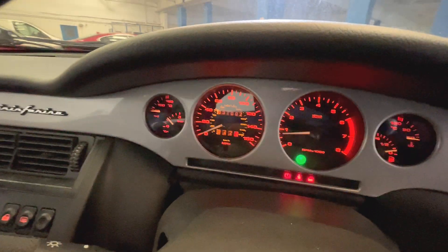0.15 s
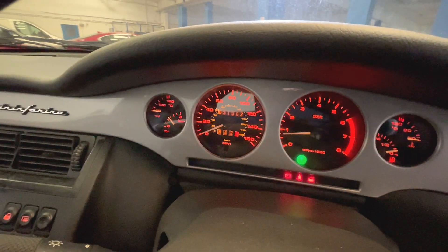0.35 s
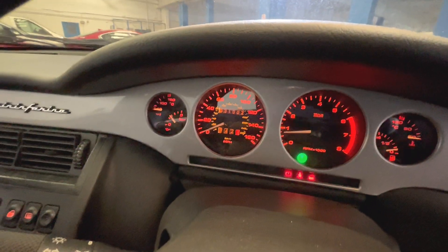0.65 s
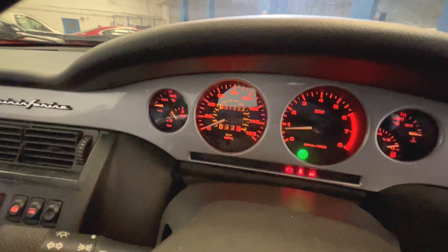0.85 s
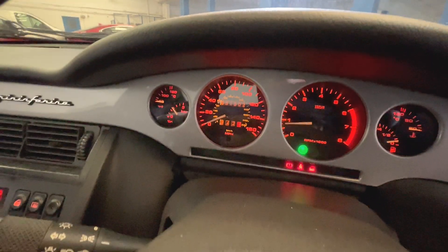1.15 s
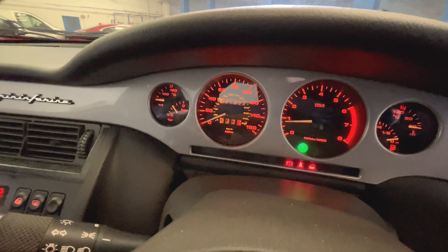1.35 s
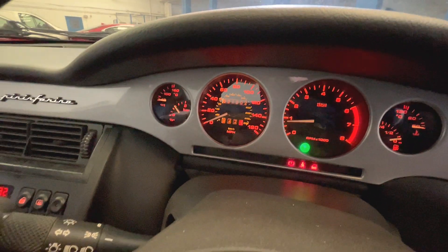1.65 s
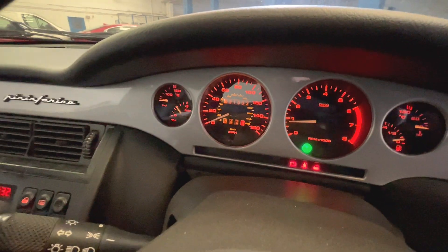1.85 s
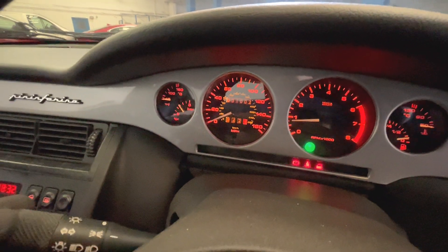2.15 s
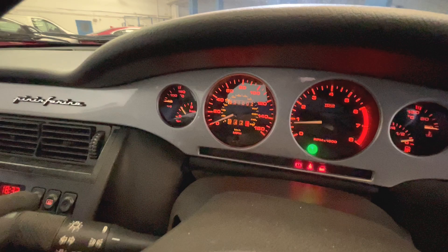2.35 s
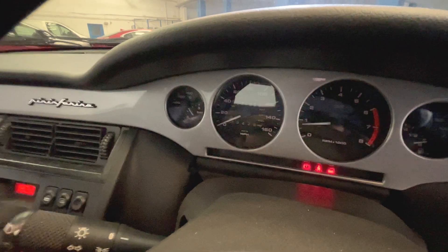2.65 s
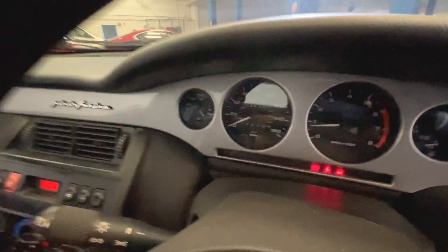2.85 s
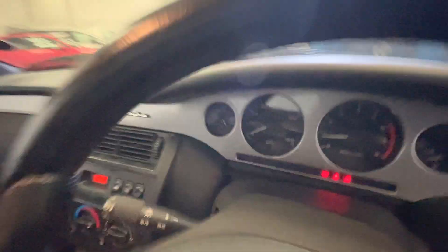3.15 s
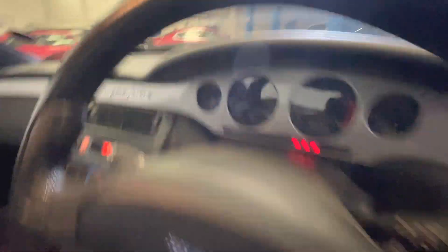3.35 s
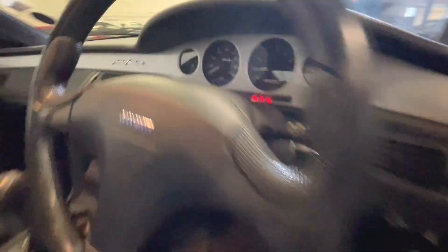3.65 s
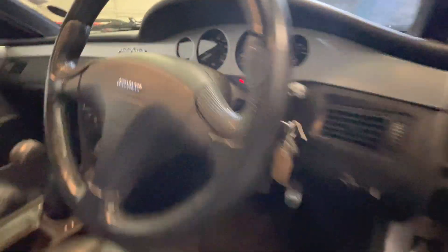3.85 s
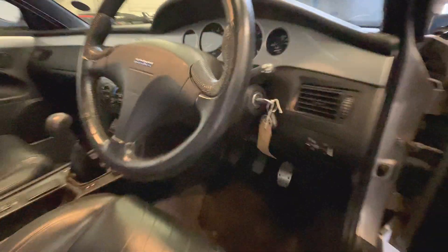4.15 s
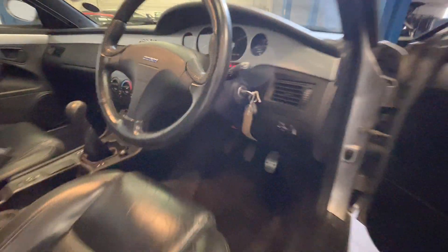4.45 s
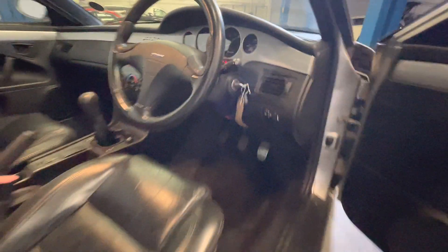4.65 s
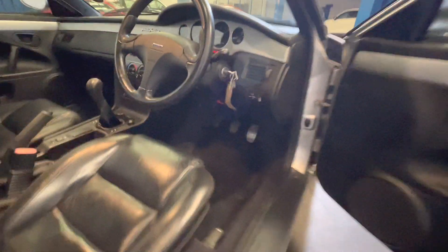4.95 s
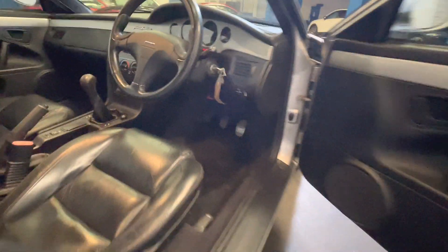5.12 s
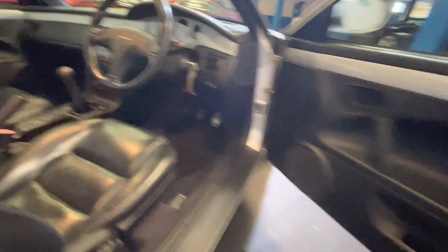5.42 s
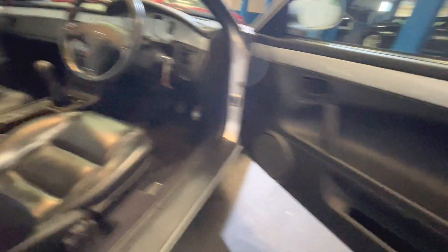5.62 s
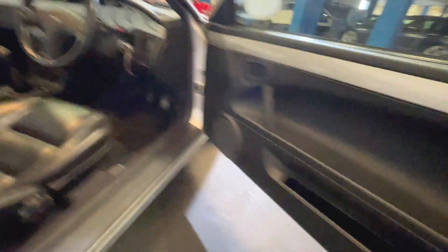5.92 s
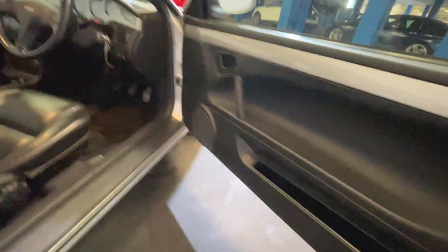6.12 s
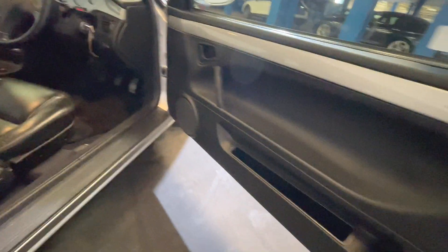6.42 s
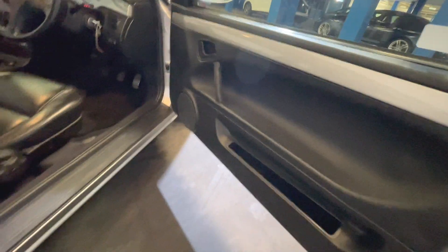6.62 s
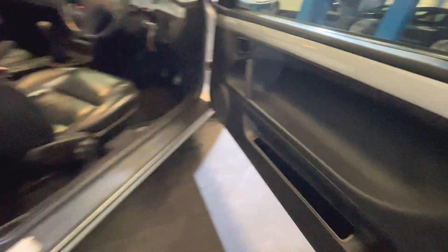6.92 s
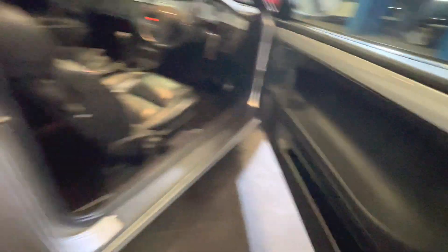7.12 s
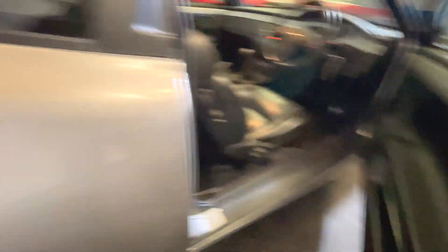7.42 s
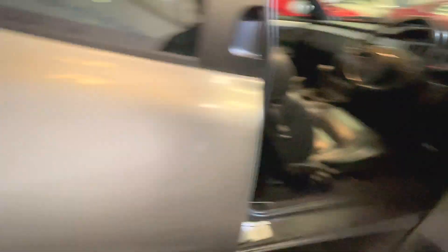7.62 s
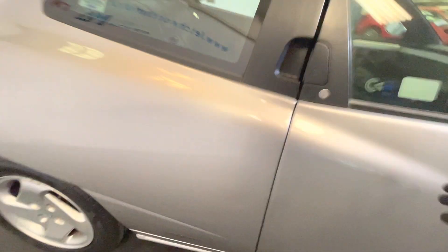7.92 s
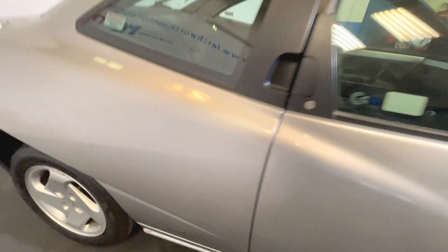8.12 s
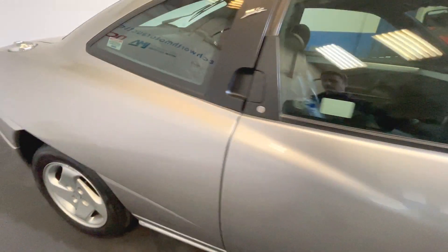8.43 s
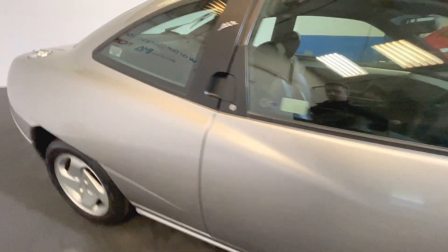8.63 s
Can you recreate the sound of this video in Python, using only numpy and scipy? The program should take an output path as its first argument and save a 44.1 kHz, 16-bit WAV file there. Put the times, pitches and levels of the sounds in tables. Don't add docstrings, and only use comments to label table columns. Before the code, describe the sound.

Low wavering engine idle heard from the seat, a small switch click, cloth rustles, growing airy hiss, then one loud solid car door slam.

```python
import sys
import numpy as np
from scipy import signal
from scipy.fft import rfft, irfft
from scipy.io import wavfile
from scipy.ndimage import uniform_filter1d

SR = 44100
rng = np.random.default_rng(int(sys.argv[2]) if len(sys.argv) > 2 else 0)


def field_ratio(decibels):
    return 10 ** (np.asarray(decibels, dtype=float) / 20)


def unload_audio(sound):
    columns = np.transpose(np.atleast_2d(sound))
    steps = np.round(np.clip(columns, -1, 1) * 32767)
    wavfile.write(sys.argv[1], SR, steps.astype(np.int16))


N = 387198
TIME = np.arange(N) / SR
OPEN_S = (3.14, 4.3)

# start_s, pulse_rate_hz
SPEED = [(.3, 21.), (.61, 22.1), (1.05, 24.7), (1.8, 24.2), (2.52, 21.), (2.92, 23.48), (3.33, 24.9),
         (4.04, 23.51), (4.65, 20.6), (4.94, 21.3), (5.28, 23.7), (5.72, 24.9), (6.21, 23.8), (7.02, 20.6),
         (7.43, 21.7), (8.05, 26.3), (8.3, 26), (8.78, 22.18)]
# start_s, level_db
BAY = [(0, -48), (.45, -48), (.85, -46.5), (1.9, -46), (2.45, -47.5), (3.2, -44.5), (3.85, -42),
       (4.26, -41.5), (4.63, -41), (5.2, -38), (5.84, -37.5), (6.7, -38), (7.35, -39.5), (7.88, -36.5),
       (8.05, -35.5), (8.14, -32), (8.35, -35.5), (8.78, -39.5)]
# start_s, share_outside (0-1)
STEP_OUT = [(2.6, 0), (3.6, 0), (5., 0.3)]
# start_s, level_db, t60_s, rise_s, treble_db, pitch_factor
SLAM = [
    (7.9156, -7.5, 0.14, 0.00077, -17.5, 0.98),
    (7.9345, -7.5, 0.032, 0.0024, -1.5, 0.537),
    (7.9522, -5.5, 0.041, 0.001, -11, 0.937),
    (7.968, -16.5, 0.051, .002, -27, 0.78),
    (8.007, -32.5, 0.058, .004, -14, 0.82),
]


def evened(x):
    return x / np.sqrt(np.mean(x ** 2) + 1e-20)


def read(points, hz):
    f, value = np.transpose(points)
    return np.interp(np.log(hz + 1), np.log(f + 1), value)


def curves(rows, t):
    s, *columns = np.transpose(rows)
    return [np.interp(t, s, c) for c in columns]


def add(mix, s, sound):
    part = mix[:, round(s * SR):][:, :sound.shape[-1]]
    part += sound[..., :part.shape[-1]]


def sided(x, lean_db):
    return x * field_ratio(np.array([[lean_db / 2], [-lean_db / 2]]))


def wander(rate_hz, t):
    total = 0
    for f in np.geomspace(rate_hz / 20, rate_hz, 12):
        total = total + np.sin(2 * np.pi * (f * t + rng.random())) / np.sqrt(f)
    return evened(total)


def drift(rate_hz):
    coarse = TIME[::256]
    return np.interp(TIME, coarse, wander(rate_hz, coarse))


def resonate(x, hz, width_hz):
    turn = np.exp(2j * np.pi * np.cumsum(hz * np.ones(x.shape[-1])) / SR)
    r = np.exp(-np.pi * width_hz / SR)
    return 2 * (turn * signal.lfilter([(1 - r) ** 2], [1, -2 * r, r * r], x / turn)).real


def band(hz, width_hz, shape=(2, N)):
    return evened(resonate(rng.standard_normal(shape), hz, width_hz))


def rattle(modes, t):
    noise = rng.standard_normal((2, len(t)))
    noise = noise + 0.34 * noise.mean(0)
    return evened(sum(field_ratio(db) * evened(resonate(noise, hz, width_hz)) for hz, width_hz, db in modes))


def drones():
    # hz, width_hz, level_db
    hall_hum = [(201.8, 13, -55), (226.8, 3.5, -56.5)]
    return sum(field_ratio(db) * band(hz, width_hz) for hz, width_hz, db in hall_hum)


def bay(turns):
    # hz, density_db (per Hz)
    bass_curve = [(22, -42), (34, -25), (55, -7), (85, 7.5), (125, -3.5)]
    inside_curve = [(200, -1), (300, -8), (450, -11), (560, -16.5), (800, -11.5), (1100, -16), (1650, -12),
                    (2100, -18.5), (2550, -16), (3000, -23), (3700, -30.5)]
    outside_curve = [(200, -4), (300, -10.5), (400, -18.5), (560, -15), (760, -15), (1100, -11),
                     (1700, -10), (2100, -9.5), (2750, -11.5), (3300, -25), (3800, -22)]
    air_inside = [(5000, -31), (6800, -31), (8600, -34), (9500, -45.5), (10800, -44.5), (12500, -41),
                  (14000, -47), (15700, -51)]
    air_outside = [(5000, -26), (6800, -25), (8400, -33), (9500, -25), (10600, -27.5), (12500, -28.5),
                   (14300, -35), (15700, -45)]
    # hz, likeness (0-1), phase_rad, lean_inside_db, lean_outside_db (left minus right)
    port_pair = [(60, 0.93, 0.64, -7, -2), (283, 0.9, 0.31, -0.5, 2), (490, 0.06, 3, -0.5, 3.5),
                 (1490, 0.5, 2.24, -3, 20), (2420, 0.04, 4.1, 1.5, 3.5), (4200, 0.14, 1.3, 5, -1),
                 (5500, 0.6, 1.7, 10.5, -7), (8200, 0.1, 1.2, 10, -7), (9300, .45, 4, 4, -14),
                 (10500, 0.74, 2.5, -0.5, 1), (11600, .62, 5.2, 1, .3), (13200, 0.9, 6.5, 0, 2)]
    rumble_over_db = (3.5, -6.5)

    frames, hz = N // 256 + 5, np.fft.rfftfreq(1024, 1 / SR)[:, None]
    t = np.arange(frames) * 256 / SR
    level_db, rate = curves(BAY, t)[0], curves(SPEED, t)[0]
    outside = np.clip(curves(STEP_OUT, t)[0], 0, 1)

    treble_db = np.interp(t, OPEN_S, (-56.5, -57.5)) + np.interp(t, (5, 5.4), (0, 3))
    treble_db += 0.59 * (level_db - level_db[0]) - level_db
    after = np.maximum(t - SLAM[2][0], 0)
    treble_db += 16 * (after > 0) * np.exp(-after / 0.068)
    rumble_db = np.interp(t, OPEN_S, rumble_over_db) + 0.5 * (rate - rate.mean())
    shaken = t - SLAM[-1][0]
    rumble_db += 10 * (shaken > 0) * np.exp(-np.abs(shaken) / 0.51)

    a, b, c, d, patches = rng.standard_normal((frames, 513, 5)).T
    patches = evened(uniform_filter1d(uniform_filter1d(patches, 10, 0), 12, 1))
    shape_db = (1 - outside) * read(bass_curve + inside_curve + air_inside, hz)
    shape_db += outside * read(bass_curve + outside_curve + air_outside, hz)
    power = field_ratio(2 * shape_db)
    middle_db, high_db, low_db = (10 * np.log10(power[i:j].sum(0)) for i, j in ((12, 70), (93, 348), (3, 9)))
    high = 1 / (1 + (3600 / (hz + 1)) ** 6)
    low = 1 / (1 + (hz / 430) ** 6)
    shape_db += high * (treble_db - high_db + middle_db) + low * (rumble_db - low_db + middle_db)
    shape_db += level_db - middle_db + 1.54 * patches

    f, *pair = np.transpose(port_pair)
    same, apart, lean_in, lean_out = (np.interp(hz, f, p) for p in pair)
    same = np.clip(same, 0, 1)
    lean = field_ratio(((1 - outside) * lean_in + outside * lean_out) / 2)
    left = a + 1j * b
    right = same * left * np.exp(1j * apart) + np.sqrt(1 - same ** 2) * (c + 1j * d)
    centre = np.sqrt(lean ** 2 + lean ** -2 + 2 * same * np.cos(apart))
    z = np.array([left * lean, right / lean]) * field_ratio(shape_db) / centre
    hiss = signal.istft(z, nperseg=1024, noverlap=768)[1][:, :N]
    return field_ratio(4.0) * hiss * (1 + 0.016 * np.cos(2 * turns))


def intake(swing, gust_db):
    # hz, width_hz, level_db (over the wash)
    side_pipes = [(1362, 25, -15.5), (466.3, 28, -20)]
    wash_db = curves(BAY, TIME)[0]
    shut = np.interp(TIME, SLAM[0][0] + np.array([-0.44, -0.18, 0.3, 0.71]), [0, 1, 1, 0])
    db = wash_db - 5.5 + np.interp(TIME, OPEN_S, (0, 0.5)) - 7.5 * shut
    hz = 1699 + 24.3 * drift(3.)
    out = field_ratio(db) * band(hz + 48.0, 300.0)
    out += field_ratio(db - 3.5 + 2.4 * gust_db) * band(hz + 34.0 * swing, 53.0)
    for hz, width_hz, side_db in side_pipes:
        out += field_ratio(wash_db + side_db) * band(hz, width_hz)
    return out


def pipes(swing, gust_db):
    speed = curves(SPEED, TIME)[0]
    speed = speed - speed.mean()
    fade = np.clip((TIME - 2.7) / 0.47, 0, 1)
    hz, upper_db = 760 + 6.7 * speed, -49.5 + 1.2 * speed
    upper = field_ratio(upper_db + 1.1 * gust_db - 3.) * band(hz + 9.5 * swing, 45.0)
    return fade * (upper + field_ratio(-56.5) * band(384.6, 37.0, N))


def fuel_pump(swing):
    # start_s, level_db
    whine_level = [(0, -65), (.75, -61), (.9, -54.5), (1.8, -58.5), (2.1, -64), (2.7, -56), (3.1, -60.5),
                   (3.6, -54), (4.1, -60), (5.1, -51.5), (6., -45), (6.6, -50), (7.6, -57), (7.8, -49)]
    turn = 2 * np.pi * 1472.5 * TIME
    level = field_ratio(curves(whine_level, TIME)[0] + 1.5 * swing) * (TIME < whine_level[-1][0])
    return np.sqrt(2) * level * np.array([1.5 * np.sin(turn), np.sin(turn - 1.2)])


def light_switch():
    snap_s = [2.4237, 2.441]
    # level_db, t60_s
    snaps = [
        (-23.5, 0.024),
        (-39, 0.065),
    ]
    # hz, width_hz, level_db
    stalk_modes = [(991, 360, -2.5), (2400, 260, 3), (4200, 1500, -5), (6300, 2000, 8.5), (8700, 760, 1),
                   (12000, 1900, 1)]
    out, t = np.zeros((2, N)), TIME[:4000]
    for s, (db, t60) in zip(snap_s, snaps):
        add(out, s, sided(rattle(stalk_modes, t) * field_ratio(db - 60 * t / t60), 3.))
    return out


def ticks():
    # start_s, peak_db, ring_hz, t60_s, lean_db (left minus right)
    tick_events = [
        (0.9041, -37.5, 3700, .025, 2),
        (3.1305, -37, 9000, 0.027, -3),
        (4.394, -39, 8200, .025, 5),
    ]
    out, t = np.zeros((2, N)), TIME[:4000]
    for s, db, hz, t60, lean_db in tick_events:
        crack = np.diff(rng.standard_normal((2, len(t) + 1)), axis=1)
        tick = 0.37 * crack + 0.53 * evened(resonate(crack, hz, 1600.))
        add(out, s, sided(tick * field_ratio(db - 2.5 - 60 * t / max(t60, .005)), lean_db))
    return out


def scuffs():
    scuff_start = [2.425, 2.75, 4.385, 5.025, 5.026, 5.31, 6.25, 6.47, 8.05, 8.06]
    # length_s, centre_hz, width_hz, level_db
    scuff_bands = [
        (0.03, 3800, 9800, -40.5),
        (0.56, 12800, 3000, -68),
        (0.027, 650, 780, -39.5),
        (0.054, 5800, 5000, -43.5),
        (0.065, 13000, 3000, -55),
        (0.18, 12500, 2200, -53.5),
        (0.098, 12300, 3000, -57),
        (0.11, 12800, 3300, -54),
        (0.28, 143, 95, -34),
        (.3, 1700, 4700, -44),
    ]
    # start_s, length_s, centre_hz, width_hz, level_db
    sleeve_rustles = [
        (2.602, 0.74, 7950, 9000, -62),
        (6.052, 0.73, 7300, 8000, -52.5),
    ]
    out = np.zeros((2, N))
    for s, (length, hz, width_hz, db) in zip(scuff_start, scuff_bands):
        noise = rng.standard_normal((2, SR // 2))[:, :round(length * SR)]
        alike = np.clip(hz / 14000, .3, .9)
        scuff = evened(resonate(noise + alike * noise[::-1], hz, width_hz))
        add(out, s, field_ratio(db) * scuff * signal.windows.tukey(noise.shape[1], .85))
    for s, length, hz, width_hz, db in sleeve_rustles:
        noise = rng.standard_normal((2, SR))[:, :round(length * SR)]
        add(out, s, field_ratio(db) * evened(resonate(noise, hz, width_hz)) * signal.windows.tukey(noise.shape[1], .5))
    return out


def grip_bumps():
    # start_s, hz, level_db, t60_s
    bump_events = [
        (.93, 190, -41, 0.17),
        (3.13, 65, -42, .25),
        (8.48, 80, -34, .25),
    ]
    out, t = np.zeros((2, N)), TIME[:SR // 4]
    for s, hz, db, t60 in bump_events:
        bump = band(hz, hz, len(t)) * np.minimum(t / .012, 1) * field_ratio(db - 60 * t / t60)
        add(out, s, bump * np.array([[1], [-1]]))
    return out


def door():
    # hz, width_hz, level_db
    latch_modes = [(550, 170, -5.5), (800, 190, -6), (1104, 130, -9.5), (1340, 340, -2.5), (1570, 220, -6),
                   (2244, 550, -2.5), (3170, 600, -11), (3710, 970, -14.5)]
    latch_treble = [(6430, 2900, 3), (8500, 3900, -1.5), (11200, 5700, 1)]
    # start_s, hz, level_db, t60_s
    thud_modes = [(7.918, 306, -16, 0.25), (7.931, 116, -9, 0.21), (7.94, 160, -15.5, 0.26),
                  (7.941, 217.3, -9, 0.15), (7.95, 330, -14, 0.091), (7.92, 507, -24.5, .1)]
    # start_s, hz, level_db, t60_s
    body_sway = (7.95, 35.5, -26.5, 2.2)
    # start_s, hz, level_db, length_s
    air_push = (7.9445, 71, -6.5, .048)
    out, t = np.zeros((2, N)), TIME[:SR]
    for s, db, t60, rise, treble_db, pitch in SLAM:
        blow = rattle(np.array(latch_modes) * [pitch, pitch, 1], t) + field_ratio(treble_db) * rattle(latch_treble, t)
        add(out, s, blow * np.minimum(t / rise, 1) * field_ratio(db - 60 * t / t60))
    for s, hz, db, t60 in thud_modes + [body_sway]:
        lag = np.array([[0.36], [-0.36]]) / 2
        ring = np.sin(2 * np.pi * hz * t + lag)
        add(out, s, sided(ring, 2) * np.minimum(t / 0.0046, 1) * field_ratio(db - 60 * t / t60))
    s, hz, db, length = air_push
    t = t[t < length]
    swell = np.minimum(t / 0.0022, 1) * np.cos(np.pi / 2 * t / length) ** 0.21
    add(out, s, field_ratio(db) * np.sin(2 * np.pi * hz * t) * swell)
    return out


def engine():
    main_orders = [3, 4, 5, 7]
    # hz, level_db
    boom_curve = [(61, -35), (64, -33.5), (67, -26.5), (74, -22.5), (84, -29.5), (89, -32), (94, -43.5),
                  (101, -57.5)]
    # start_s, third_order_db, fourth_order_db
    place_gain = [(0, -4.5, -2), (1.098, -1, -2.5), (1.8, -3.5, -2), (3.55, -0.5, -5), (3.7, -8.5, 6),
                  (4.35, -10.5, -6), (4.94, -7, 3.5), (5.3, -11, 0), (5.448, 1.5, 9), (6.05, 3, 6),
                  (6.35, -7, -2), (7.4, -3.5, 7.5), (7.52, -10, -7), (7.8, 5, 5), (8.06, 1.5, 1),
                  (8.5, 5, 3), (8.65, -19, 0), (8.78, -4, 4)]
    # seat_db, outside_gain_db, slope_db (per Hz of rate), wander_db
    upper_orders = [(-51, 4.5, 1, 2), (-53.5, 2.5, 1, 4.5)]
    # multiple, level_db, wander_db, slope_db (per Hz of rate)
    weak_orders = [(1, -58, 3, 0), (2, -45.5, 2, -1.8), (2.75, -52, 3, 1.5), (3.25, -53, 2.5, -1.5),
                   (3.5, -50, 2.5, -2.5), (3.75, -54, 2.5, -2), (4.25, -53, 2.5, -2.5), (6, -51, 3, 1),
                   (8, -58, 3, 0), (9, -59, 3, 0)]
    # start_s, end_s
    swing_round = (4.2, 5.1)

    rate = uniform_filter1d(curves(SPEED, TIME)[0], size=SR // 8)
    faster = rate - rate.mean()
    outside = np.clip(curves(STEP_OUT, TIME)[0], 0, 1)
    turns = 2 * np.pi * np.cumsum(rate) / SR
    main_db = [read(boom_curve, k * rate) + gain_db for k, gain_db in zip(main_orders, curves(place_gain, TIME))]
    for db, out_db, slope_db, _ in upper_orders:
        main_db.append(db + out_db * outside / STEP_OUT[-1][1] + slope_db * faster)
    out = np.zeros(N)
    for k, db, wander_db in zip(main_orders, main_db, [.8, .7, upper_orders[0][-1], upper_orders[1][-1]]):
        uneven_db = wander_db * drift(12.)
        out += field_ratio(db + uneven_db) * np.cos(k * turns + k)
    for k, db, wander_db, slope_db in weak_orders:
        drift_db = wander_db * drift(3.) + slope_db * (1.4 - 1.5 * outside) * faster
        out += field_ratio(db + drift_db) * np.cos(k * turns + 6 * rng.random())
    turned = np.interp(TIME, swing_round, (0, 1))
    left = (1 - turned) * np.roll(out, 36) + turned * np.roll(out, -16)
    lean_db = 1.8 - 1.5 * turned
    return np.sqrt(2) * np.array([left * field_ratio(lean_db / 2), out * field_ratio(-lean_db / 2)]), turns


def scene():
    boom, turns = engine()
    swing, gust_db = drift(8.), drift(8.)
    air = bay(turns) + intake(swing, gust_db) + pipes(swing, gust_db)
    steady = drones() + fuel_pump(swing)
    handling = light_switch() + ticks() + scuffs() + grip_bumps()
    return boom + air + steady + handling + door()


def band_limit(x):
    return signal.sosfilt(signal.butter(12, 16470, fs=SR, output="sos"), x)


def record(dry):
    # hz, half_width_hz, level_db
    housing_dips = [(5650, 300, -6.5), (7450, 380, -6)]
    hz = np.fft.rfftfreq(N, 1 / SR)
    colour_db = sum(db * np.exp(-((hz - f) / width) ** 4) for f, width, db in housing_dips)
    edge_db = -45. * np.clip((hz - 15750) / 300, 0, 1)
    limited = 1.199 * np.tanh(dry / 1.219)
    mix = irfft(rfft(limited) * field_ratio(colour_db + edge_db), N)
    return band_limit(mix)


dry = scene()
out = record(dry)
unload_audio(out)
```